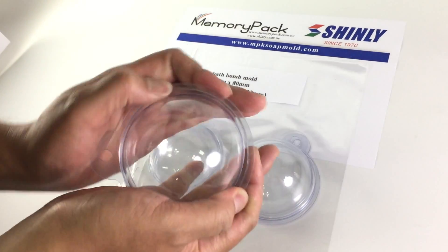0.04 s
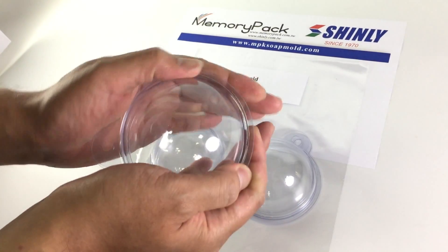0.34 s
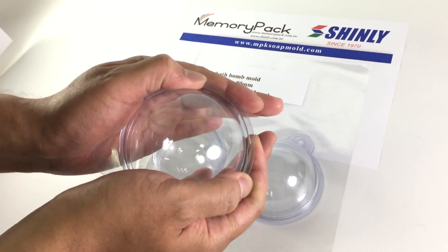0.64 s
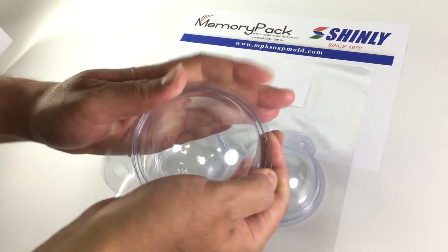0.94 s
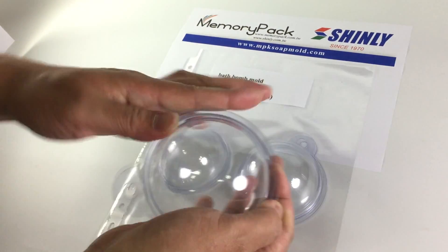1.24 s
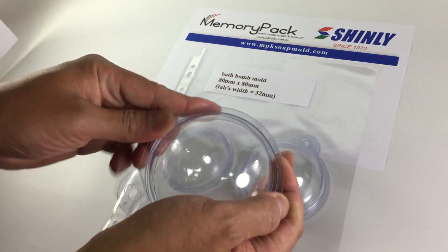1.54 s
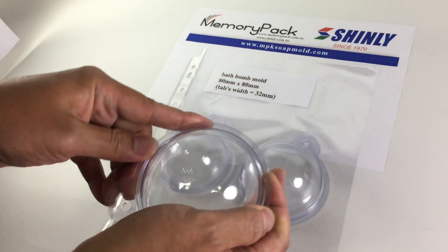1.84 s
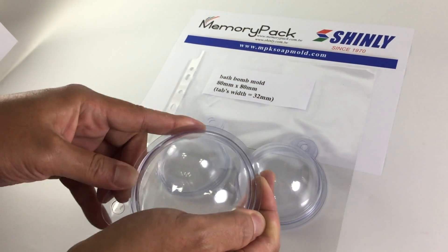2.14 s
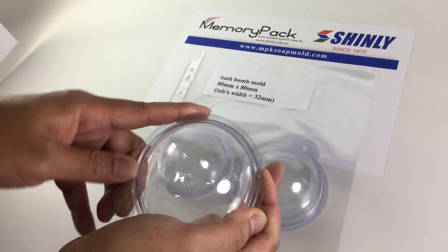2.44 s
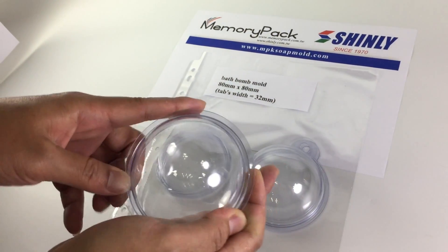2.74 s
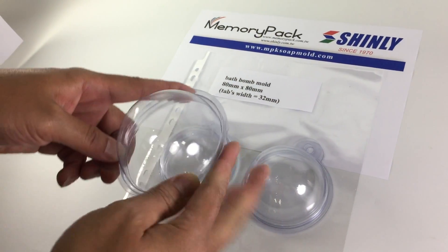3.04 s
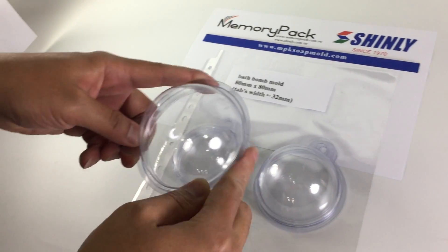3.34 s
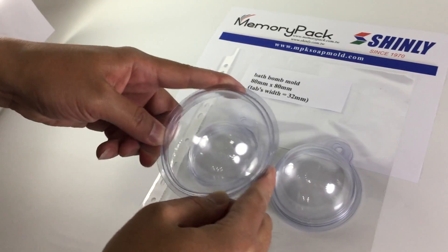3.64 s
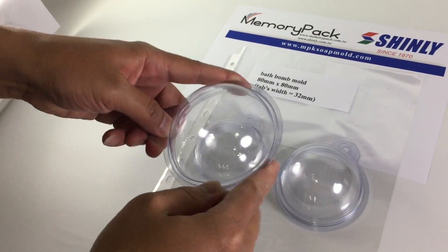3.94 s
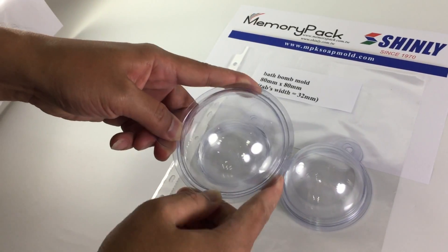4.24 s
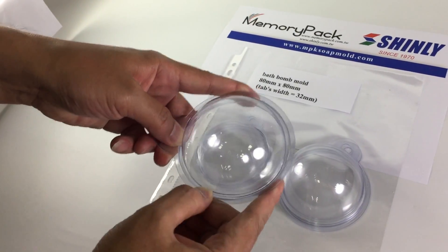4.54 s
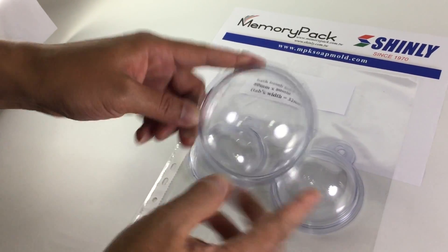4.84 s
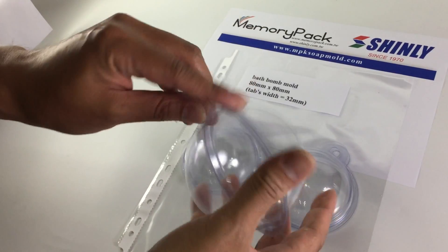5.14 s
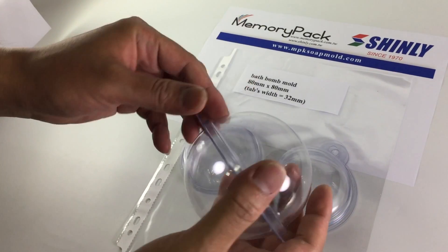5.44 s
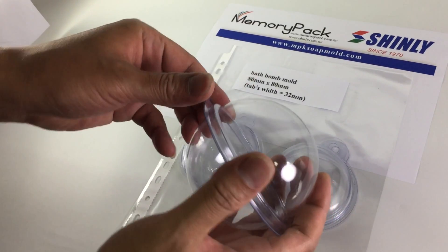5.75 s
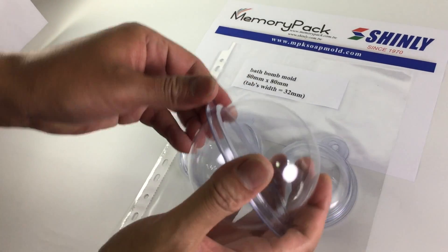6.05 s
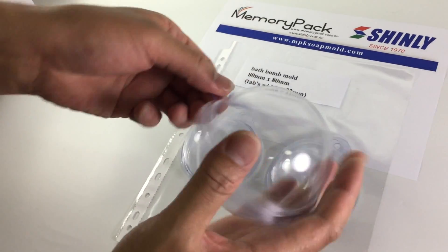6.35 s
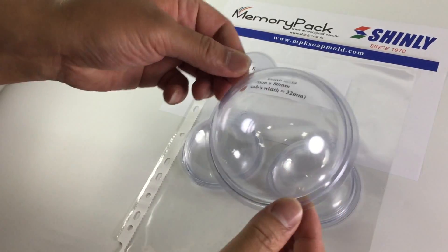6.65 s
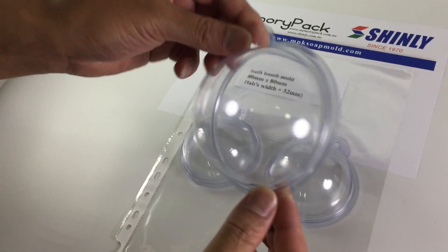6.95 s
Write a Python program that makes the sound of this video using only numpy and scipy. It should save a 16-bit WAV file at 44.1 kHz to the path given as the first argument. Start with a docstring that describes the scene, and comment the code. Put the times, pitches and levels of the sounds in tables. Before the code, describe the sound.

Two thin plastic half-shells are squeezed and turned in the hands, close to the microphone in a small quiet room. Their rims click irregularly and creak in short bursts, growing louder until they give way with one hollow pop. The handling then turns quiet, with fingers brushing the plastic and one sharp snap as the halves meet again. Faint thin squeaks come and go over a low electrical hum.

```python
"""Squeezing two plastic half-shells

Two clear plastic half-shells are squeezed and turned between the hands, close by, in a small quiet room.
Their rims stick and slip, and each slip rings the plastic: one makes a click, a quick run makes a creak.
They give way with one hollow pop, and later snap together once more.
Fingers brush the plastic, faint thin squeaks come and go, and the mains hums low."""
import sys
import numpy as np
from scipy import signal
from scipy.fft import rfft, irfft, next_fast_len
from scipy.io import wavfile
from scipy.ndimage import uniform_filter1d, map_coordinates

SR = 44100
rng = np.random.default_rng(int(sys.argv[2]) if len(sys.argv) > 2 else 0)


def generate_wav(sig):
    """Save sig (samples, or channels by samples) to the path in sys.argv[1] as 16-bit PCM at SR."""
    pcm = np.round(np.clip(np.atleast_2d(sig).T, -1, 1) * 32767).astype(np.int16)
    wavfile.write(sys.argv[1], SR, pcm)


N = 316627

# how the low rustle of hands and room rises and falls: t/s, relative level/dB
RUSTLE_LEVELS = [(0.0, -41.5), (0.96, -47.5), (1.1, -46.5), (3.74, -46), (6.62, -47.5), (6.76, -48.5),
                 (7.18, -48.5)]
# tone colour of that rustle: f/Hz, relative level/dB
RUSTLE_SPECTRUM = [(15, -40.5), (25, -24.5), (48, -1.5), (81, -8.5), (108, -2), (141, -8.5), (263, -14.5),
                   (297, -18), (387, -23.5), (600, -61.5), (780, -81.5), (1320, -120)]
# tone colour of the still air: f/Hz, relative level/dB
AIR_SPECTRUM = [(260, -28), (450, -5), (589, -11), (950, -4.5), (1260, -12.5), (1440, -14), (1810, -15),
                (5500, -28), (13200, -36), (16000, -42)]
# the two tones of the mains hum: f/Hz, level/dB
HUM_TONES = [(58.8, -54), (117.8, -59.5)]
# how long the room rings: f/Hz, time to fade by 60 dB/s
ROOM_DECAY = [(200, 0.76), (1500, 0.32), (5000, 0.24), (14000, 0.34)]
# thin squeaks, one list of points each: t/s, f/Hz, level/dB
SQUEAK_GLIDES = [
    [(0.44, 3540, -77), (0.48, 3450, -64), (0.54, 3480, -64), (0.58, 3460, -71)],
    [(1.285, 3530, -59), (1.335, 3410, -51), (1.41, 3300, -60), (1.53, 3350, -62), (1.8, 3220, -67)],
    [(3.33, 12440, -81), (3.39, 13100, -74), (3.47, 13970, -72), (3.51, 13010, -76)],
    [(6.17, 12580, -80), (6.23, 13260, -72), (6.33, 14200, -73), (6.38, 14200, -87)],
]
# skin and rims slide: start/s, end/s, level/dB, brightness/(dB per octave)
RUBS = [(0.005, 0.065, -40, -5.5), (0.018, 0.456, -56.5, 1.5), (0.568, 0.64, -56, 4),
        (0.935, 1.036, -52, 3), (1.101, 1.36, -62.5, 0), (1.314, 1.495, -54, 9), (2.082, 2.139, -34, 1.5),
        (2.358, 2.52, -58, -0.5), (2.671, 2.725, -51, -7), (2.934, 3.06, -53, -5), (3.066, 3.102, -35.5, 3),
        (3.754, 3.82, -31.5, -1.5), (3.964, 4.039, -38.5, -2.5), (4.45, 4.488, -53, -3),
        (4.54, 4.681, -56.5, 20), (4.915, 4.953, -52, 1.5), (5.246, 5.29, -54.5, 0.5),
        (5.355, 5.406, -53, -0.5), (5.453, 5.469, -62, 4), (5.491, 5.54, -63, 1), (5.587, 5.62, -63, -1),
        (5.766, 5.811, -64, 6.5), (6.235, 6.276, -52, -2), (6.27, 6.41, -55.5, 2), (6.447, 6.553, -43.5, 3)]
# the shells flex as a whole, twice faintly and once loudly: t/s, level/dB
FLEXES = [(0.011, -36), (2.511, -36.5), (4.6447, -11)]
# low tones of the hollow ball that the shells form: f/Hz, relative level/dB, time to fade by 60 dB/s
BALL_TONES = [(111.3, -3.5, 0.054), (213, -0.5, 0.071), (334, -3.5, 0.1), (432, 0, 0.071),
              (724, -11.5, 0.032), (946, -2.5, 0.04)]
# the hold changes from cupped palm to fingertip, to two fingers, to open shells: t/s
HOLD_CHANGES = [2.36, 3.25, 5.1]
# resonances, the pitches at which the shells ring: f/Hz, width/Hz, then level/dB in each of the four holds
SHELL_RESONANCES = [(206, 49, 2, -3, -11.5, -30.5), (350, 135, 0.5, -5.5, -10.5, -28),
                    (678, 96, -4, -7.5, -16, -28.5), (973, 237, 3, 0, -6.5, -14.5),
                    (1300, 310, 0.5, -3, -6.5, -13.5), (1458, 180, -19, -2.5, -2.5, -23.5),
                    (1798, 260, -3.5, -9.5, -6, 1), (2075, 290, -1, -7, -10, -24.5),
                    (2440, 210, -11, -5.5, -14, -7), (3086, 270, -13.5, -5.5, -16, -10),
                    (3495, 120, -14, -12, -14, -29.5), (3770, 260, -19, -12.5, -18, -10.5),
                    (4300, 850, -12.5, -12, -15.5, -10.5), (5470, 970, -13.5, -13, -14.5, -11),
                    (6250, 1100, -15, -21.5, -17, -21.5), (8800, 900, -33, -28, -23.5, -30.5),
                    (14100, 5200, -22, -25.5, -20.5, -26.5)]
# edges of a slip's three bands, called body (middle), ring (high) and crack (highest): f/Hz
SLIP_BAND_EDGES = [700, 2500, 7000, 16000]
# single sharp catches of the rims, with ring and crack counted from the body level:
# t/s, body level/dB, ring/dB, crack/dB, f/Hz of the resonance that the contact spot favours
RIM_CLICKS = [(0.01, -37.5, -5.5, -19, 1410), (0.1089, -39.5, -8, -43, 1400), (0.149, -36, -3, -23, 816),
              (0.1759, -36, -9, -35, 850), (0.213, -30, -0.5, -16, 3660), (0.2636, -30.5, -3, -18, 700),
              (0.2884, -28, -3, -18, 1030), (0.476, -48, 0, -17, 2590), (0.5698, -31, -4, -22, 5570),
              (0.5855, -28, -6, -14, 2070), (0.6074, -37.5, 6, -0.5, 5650), (0.6532, -33.5, 1.5, -10, 2310),
              (0.677, -29.5, -.5, -11.5, 2310), (0.7152, -31, 2, -8.5, 2300), (0.7619, -30, 2, -10, 2350),
              (0.8375, -31, 2.5, -7, 2390), (0.847, -31, -4, -26, 2430), (0.8927, -27.5, 2, -8.5, 1860),
              (1.0105, -36.5, -10, -36, 965), (1.0853, -50.5, 0.5, -32, 3780),
              (1.1201, -32.5, -2.5, -16.5, 950), (1.359, -30.5, -3.5, -11, 2010),
              (1.3769, -27, -6, -17, 2040), (1.5467, -41, -1, -9, 2150), (1.5882, -27.5, 0, -8.5, 2230),
              (1.6166, -31.5, -2, -16, 2160), (1.674, -44, -11, -35, 2150), (1.7822, -25, -3, -12.5, 1200),
              (1.8651, -28, -4, -14, 1060), (1.9075, -32, -0.5, -9.5, 1020), (1.9534, -27.5, -2, -19, 2580),
              (2.0072, -38, -19, -34, 1210), (2.066, -31.5, -1.5, -6, 2630), (2.0854, -33, 2.5, -6.5, 2610),
              (2.2146, -27, -7.5, -15.5, 1340), (2.2967, -42.5, 3.5, -12, 2356),
              (2.4596, -40, -9.5, -48, 1440), (2.511, -29, -5, -31, 2580), (2.5528, -33.5, -.5, -18.5, 910),
              (2.631, -34, 0, -22, 2860), (2.8534, -43, -6, -28, 1300), (2.8643, -35, -6.5, -35, 1287),
              (3.0559, -32, 9.5, -7, 3847), (3.1006, -26.5, 1.5, -7.5, 1692), (3.3313, -37, 0.5, -23, 2988),
              (3.392, -24, .5, -7, 1322), (3.4074, -23, -5, -10, 1004), (3.4269, -25, -2, -11, 1126),
              (3.5115, -25, -6.5, -12, 984), (3.571, -27.5, -3, -6.5, 963), (3.6553, -33, 2, -6, 5270),
              (3.747, -23.5, -0.5, -7.5, 1089), (3.8356, -24, -2, -8, 2001), (3.89, -30, .5, -13.5, 1058),
              (3.916, -35.5, -15, -40, 1040), (4.0207, -24, -6.5, -17.5, 807),
              (4.0998, -20.5, -8, -16, 1263), (4.124, -24.5, -10, -20, 1310),
              (4.2089, -19.5, -11, -18, 1530), (4.3, -30.5, -11.5, -38, 1586), (4.351, -41, 1, -7, 987),
              (4.541, -20.5, -7, -10.5, 1430), (4.603, -23.5, 3, -9.5, 3240),
              (4.642, -25.5, -.5, -8, 860.5), (4.6443, -14.5, -8.5, -18, 967),
              (4.6739, -24.5, -11.5, -19.5, 1729), (4.6944, -29.5, -11, -16, 1200),
              (4.748, -24, -6, -14.5, 2025), (4.8049, -42.5, -10, -43, 2013), (4.841, -35, 5.5, -9, 1860),
              (4.8545, -32, -8.5, -16, 1873), (4.8933, -35, -19, -30, 1880),
              (5.3301, -42, -3.5, -20.5, 5430), (5.8284, -56.5, -1, -8, 1830),
              (5.969, -17.5, -3, -19.5, 4124), (6.2068, -47, 5.5, -0.5, 2930), (6.709, -58, -4, -10, 2910)]
# under steady pressure the rims stick and slip at a nearly even pace:
# start/s, end/s, slip rate/Hz, starting body level/dB, growth/dB, ring/dB, crack/dB, favoured f/Hz
RIM_CREAKS = [(0.069, 0.083, 66, -42.5, 4.5, -9, -29, 1740), (0.227, 0.2376, 88, -31, -2, -8, -24, 960),
              (0.3092, 0.3384, 68, -35, -4.5, -5, -25, 1000),
              (0.3802, 0.4365, 73, -39, 5, -2.5, -20.5, 2420), (0.594, 0.633, 77, -39.5, 4, -1, -9, 5740),
              (0.9104, 0.949, 53, -28.5, -5.5, 3, -8, 1930), (1.113, 1.131, 108, -40.5, 5.5, -11, -20, 960),
              (1.188, 1.293, 19, -53.5, 10.5, -11, -22, 950),
              (1.848, 1.881, 120, -35.5, 6, -7.5, -14, 1049),
              (2.0222, 2.044, 86, -31, -1.5, -2.5, -15.5, 2550),
              (2.0947, 2.1373, 128, -39.5, 1, -4, -20, 2550), (2.168, 2.202, 57, -41, 1.5, -12, -48, 2470),
              (2.239, 2.2765, 48, -41, -3, -5.5, -44, 2380), (2.4094, 2.43, 48, -48.5, 4.5, -10, -29, 1400),
              (2.506, 2.531, 57.6, -38.5, -4, -10, -25, 950), (2.5652, 2.5815, 117, -41, 0.5, -6, -29, 933),
              (2.645, 2.675, 148, -41.5, 5.5, -4.5, -44, 2800),
              (2.6826, 2.721, 100, -28.5, -5, -4.5, -30.5, 1150),
              (2.948, 2.985, 94.5, -38, 6, -10.5, -28, 1000),
              (2.998, 3.0434, 88, -40.5, 7.5, -7, -26.5, 1700),
              (3.068, 3.0892, 153, -24.5, -4.5, -0.5, -18.5, 1300),
              (3.128, 3.157, 30, -43, -1.5, -50, -36, 1620), (3.2956, 3.356, 65, -41.5, -3, -18, -25, 1307),
              (3.6407, 3.6732, 61, -38.5, 2, -1, -13, 5347),
              (3.7009, 3.713, 83, -36.5, -2, -6.5, -24, 1300),
              (3.7607, 3.814, 93, -24.5, -2.5, -4, -12.5, 1270),
              (3.9656, 4.006, 145, -38, 10, -1.5, -10.5, 809),
              (4.242, 4.2577, 146, -29.5, -16, -16, -38, 970), (4.4633, 4.491, 68, -44.5, -6, -4, -23, 984),
              (4.5849, 4.5941, 135, -37.5, 0, -11.5, -28, 1430), (6.425, 6.4418, 63, -50.5, 2, 0, -9, 1806)]

TOP_HZ = 16100  # upper limit of the sound
PACE_SCATTER, FORCE_SCATTER_DB = .07, 2.5  # a creak's uneven timing (share of a gap) and force
HARDENING = .4  # dB of extra crack for each dB of extra force
RECOVERY_S = .004  # this close to a click the rims have no strain left for another slip


def amp(db):
    """Turn decibels into a factor to multiply by."""
    return 10 ** (np.asarray(db) / 20)


def unit(x):
    """Scale a sound to an average power of 1."""
    return x / np.sqrt(np.mean(x ** 2) + 1e-20)


def along(points, hz):
    """Read between (frequency, value) points, giving each octave equal space."""
    f, v = np.transpose(points)
    return np.interp(np.log(hz + 1), np.log(f + 1), v)


def wobble(rate):
    """A smooth random curve through `rate` points a second."""
    points = rng.standard_normal(int(N * rate / SR) + 4)
    return map_coordinates(points, [np.arange(N) * rate / SR])


def filtered(x, response):
    """Turn each frequency of x up or down by response(hz)."""
    size = next_fast_len(len(x) + SR // 4)
    return irfft(rfft(x, size) * response(np.fft.rfftfreq(size, 1 / SR)), size)[:len(x)]


def noise(spectrum):
    """Noise with the given tone colour and an average power of 1."""
    return unit(filtered(rng.standard_normal(N), lambda hz: amp(along(spectrum, hz))))


def causal(gain):
    """A filter with this gain that rings only after it is struck (minimum phase)."""
    cepstrum = irfft(np.log(gain + 1e-6))
    half = len(cepstrum) // 2
    cepstrum[1:half] *= 2
    cepstrum[half + 1:] = 0
    return np.exp(rfft(cepstrum))


def add(track, s, sound):
    """Mix a sound in at s seconds."""
    start = max(round(s * SR), 0)
    track[start:start + len(sound)] += sound[:max(N - start, 0)]


def background(rustle_db, air_db, hum_waver_db):
    """Low rustle of hands and room, still air and a wavering mains hum."""
    t = np.arange(N) / SR
    rustle = noise(RUSTLE_SPECTRUM) * amp(rustle_db + np.interp(t, *np.transpose(RUSTLE_LEVELS)))
    hum = np.zeros(N)
    for hz, db in HUM_TONES:
        peak = np.sqrt(2) * amp(db + hum_waver_db * wobble(1.8))
        hum += peak * np.sin(2 * np.pi * hz * t + 0.43 * wobble(7.3))
    return rustle + amp(air_db) * noise(AIR_SPECTRUM) + hum


def room_echo(x):
    """The walls answer with a short tail in which the bass lasts longest."""
    hz, t, spectra = signal.stft(rng.standard_normal(SR // 2), SR, nperseg=256)
    fade = amp(-60 * t / along(ROOM_DECAY, hz)[:, None])
    tail = signal.istft(spectra * fade, SR, nperseg=256)[1]
    tail *= 1 - np.exp(-np.arange(len(tail)) / SR / 0.0019)  # soft start
    return signal.fftconvolve(x, tail / np.linalg.norm(tail))[:N]


def squeaks(waver, flutter_db, overtone_db):
    """Thin, unsteady gliding squeaks; the lower ones also sound an octave up."""
    track, t = np.zeros(N), np.arange(N) / SR
    for glide in SQUEAK_GLIDES:
        s, hz, db = np.transpose(glide)
        pitch = np.interp(t, s, hz) * (1 + waver * wobble(700))
        phase = 2 * np.pi * np.cumsum(pitch) / SR
        level = amp(np.interp(t, s, db) + flutter_db * wobble(64)) * (t > s[0]) * (t < s[-1])
        overtone = amp(overtone_db) * (2 * pitch < TOP_HZ) * np.sin(2 * phase)
        track += uniform_filter1d(level, size=220) * (np.sin(phase) + overtone)
    return track


def last_contact_hz(s):
    """The resonance favoured by the spot where the rims last clicked."""
    times, *_, favoured_hz = np.transpose(RIM_CLICKS)
    return favoured_hz[np.searchsorted(times[1:], s)]


def shell_gain(hz, s, favoured_hz, lift_db, lift_octaves, vary_db=1.0):
    """How the shells ring as they are held at time s, lifted where the contact spot favours them."""
    centre, width, *holds = np.transpose(SHELL_RESONANCES)[:, :, None]
    hold_db = holds[np.searchsorted(HOLD_CHANGES, s)]
    strength = amp(hold_db + vary_db * rng.standard_normal(centre.shape))
    peaks = hz * width / np.abs(centre ** 2 - hz ** 2 + 1j * hz * width)
    octaves_away = np.log2((hz + 1) / favoured_hz)
    lift = amp(lift_db * np.exp(-.5 * (octaves_away / lift_octaves) ** 2))
    return lift * np.sqrt(np.sum((strength * peaks ** 1.335) ** 2, axis=0))


def rubbing(grains_per_s, unsteady_db, skin_hz):
    """Sliding is a swarm of tiny slips over a hiss, softened by skin and heard through the shell."""
    track = np.zeros(N)
    for start, end, db, tilt_db in RUBS:
        def colour(hz):
            shell = shell_gain(hz, start, last_contact_hz(start), lift_db=0.5, lift_octaves=0.057)
            return shell * amp(tilt_db * np.log2(hz + 1)) / np.sqrt(1 + (hz / skin_hz) ** 2)

        length = int((end - start) * SR)
        grains = (rng.random(length) < grains_per_s / SR) * rng.standard_normal(length)
        hiss = rng.standard_normal(length)
        rub = unit(filtered(unit(grains) + hiss, colour))
        add(track, start, amp(db) * rub * signal.windows.tukey(length, .7))
    return track * amp(unsteady_db * wobble(90))


def pops(attack_s):
    """A sudden flex sounds the hollow ball's low tones, neighbours swinging in opposite directions."""
    track, t = np.zeros(N), np.arange(SR // 3) / SR
    ring = sum((-1) ** k * amp(db - 60 * t / fade_s) * np.sin(2 * np.pi * hz * t)
               for k, (hz, db, fade_s) in enumerate(BALL_TONES))
    for s, db in FLEXES:
        add(track, s, -amp(db) * ring * (1 - np.exp(-t / attack_s)))
    return track


def list_slips():
    """Every slip in time order: the clicks, and each creak as a run whose stronger slips are brighter."""
    slips, click_times = list(RIM_CLICKS), np.transpose(RIM_CLICKS)[0]
    for start, end, rate, db, growth_db, ring_db, crack_db, favoured_hz in RIM_CREAKS:
        middle_db = db + growth_db / 2
        for progress in np.linspace(0, 1, round((end - start) * rate) + 1):
            late, force = rng.standard_normal(2)
            delay = PACE_SCATTER * late * np.sin(np.pi * progress) / rate
            s = start + progress * (end - start) + delay
            extra_db = growth_db * (progress - .5) + FORCE_SCATTER_DB * force
            harder_db = HARDENING * extra_db
            if np.abs(click_times - s).min() > RECOVERY_S:
                levels = middle_db + extra_db, ring_db + harder_db / 2, crack_db + harder_db
                slips.append((s, *levels, favoured_hz))
    return sorted(map(tuple, slips))


def rim_slips(gain_db, wall_fade_s, table_db, table_fade_s, memory_s, mellowing=1.0, size=4096):
    """Each slip is a tiny kick that rings the shell, scatters around its wall and returns off the table."""
    hz, t = np.fft.rfftfreq(size, 1 / SR), np.arange(size) / SR
    bands = [(hz >= low) & (hz < high) for low, high in zip(SLIP_BAND_EDGES, SLIP_BAND_EDGES[1:])]
    attack_samples = .006 * SR
    # bending waves travel slower the lower they are, which spreads the attack into a tiny falling chirp
    bending = np.exp(-1j * .3 * np.sqrt(hz))
    wall = amp(-60 * t / wall_fade_s)
    table = amp(-60 * t / table_fade_s) * (1 - np.exp(-t / 0.003))
    fade = wall / np.linalg.norm(wall) + amp(table_db) * table / np.linalg.norm(table)
    track, spot, last_s = np.zeros(N), rng.standard_normal(size), 0
    for s, db, ring, crack, favoured_hz in list_slips():
        # slips in quick succession start from nearly the same spot and sound alike
        alike = np.exp(-(s - last_s) / memory_s)
        spot = alike * spot + np.sqrt(1 - alike ** 2) * rng.standard_normal(size)
        last_s = s
        paths = bending * (1 + rfft(spot * fade))
        # every slip rings the favoured resonance strongly, with its upper ring rolled off
        shell = shell_gain(hz, s, favoured_hz, lift_db=6.5, lift_octaves=.17)
        shell /= np.sqrt(1 + mellowing * (hz / 3600) ** 4)
        # the hardness of the slip sets its share of body, ring and crack
        power = [2 * np.sum(np.abs(shell * paths)[band] ** 2) / size / attack_samples for band in bands]
        body_db, ring_db, crack_db = db + np.array([0, ring, crack]) - 10 * np.log10(power)
        hardness = amp(along([(2100, body_db), (3000, ring_db), (6200, ring_db), (8000, crack_db)], hz))
        add(track, s, irfft(causal(shell * hardness) * paths))
    return amp(gain_db) * track


def scene():
    """The shells close by, with a faint room echo and the quiet background, in one channel."""
    plastic = rim_slips(gain_db=.5, wall_fade_s=0.019, table_db=-9.5, table_fade_s=0.099, memory_s=0.025)
    plastic += pops(attack_s=0.00053)
    plastic += rubbing(grains_per_s=700, unsteady_db=1.1, skin_hz=12100)
    plastic += squeaks(waver=0.014, flutter_db=4.0, overtone_db=-13)
    echo = amp(-21) * room_echo(plastic)
    return (plastic + echo + background(rustle_db=-2.0, air_db=-64, hum_waver_db=1.0))[None]


def record(dry):
    """Cut away the very highest treble, above TOP_HZ."""
    return filtered(dry[0], lambda hz: 1 / (1 + (hz / TOP_HZ) ** 120))[None]


dry = scene()
out = record(dry)
generate_wav(out)
```